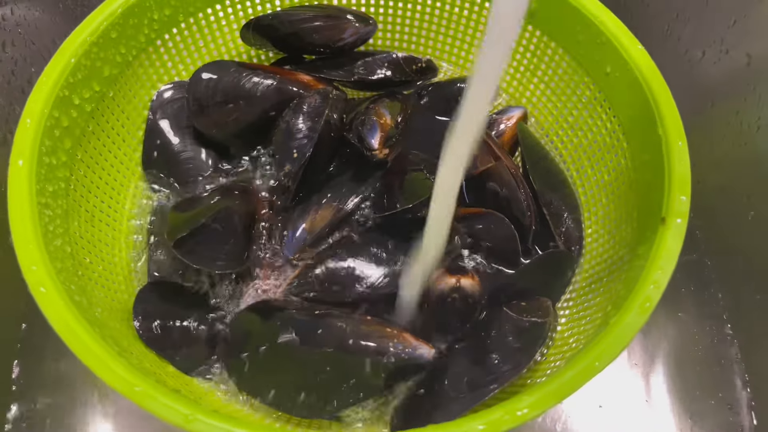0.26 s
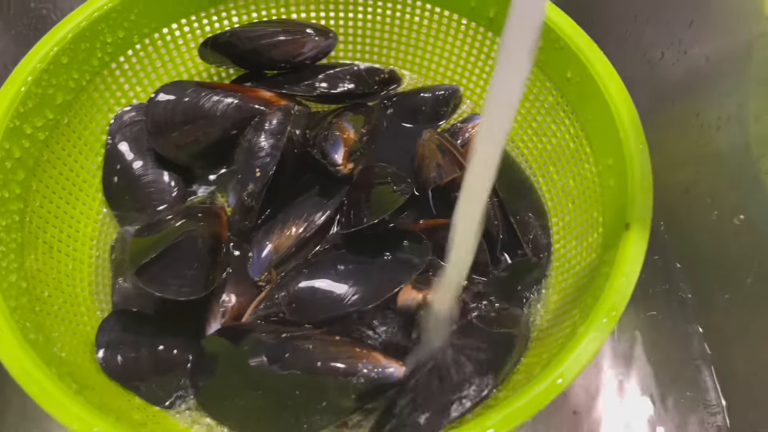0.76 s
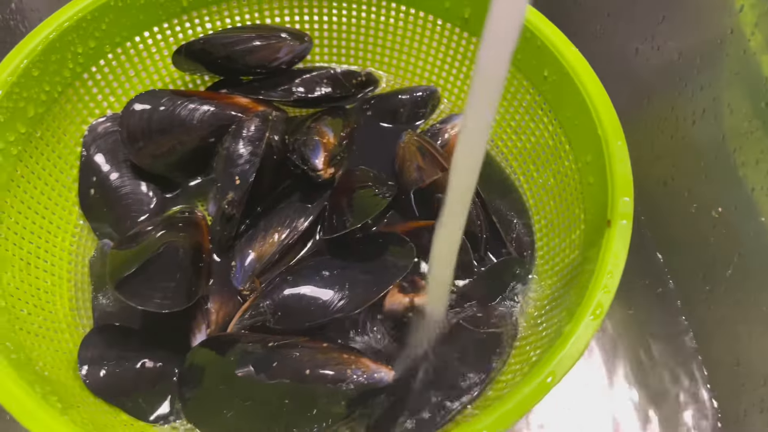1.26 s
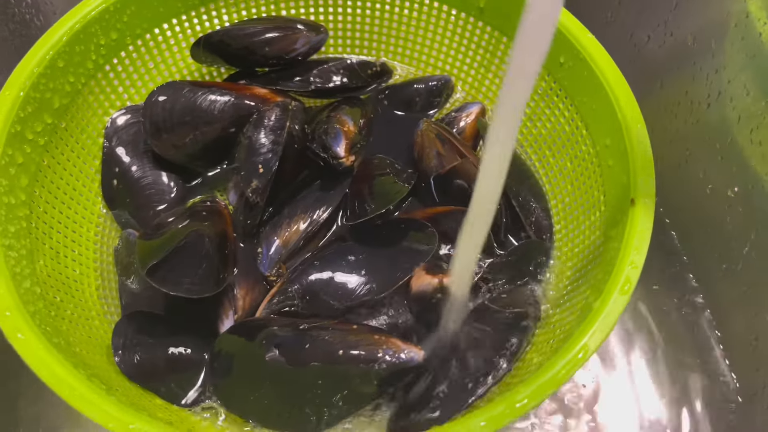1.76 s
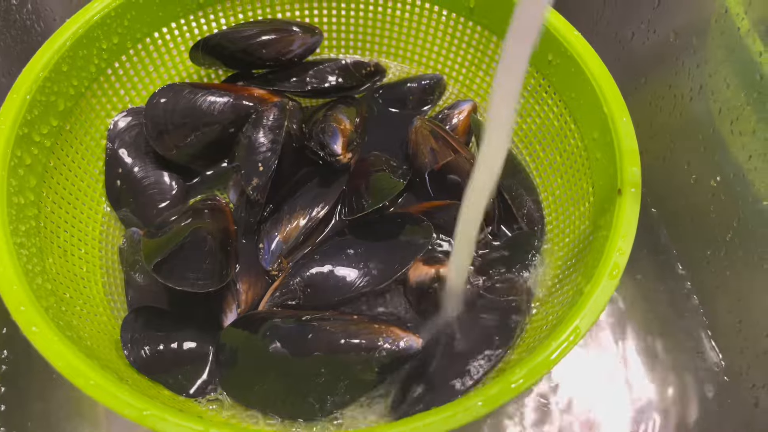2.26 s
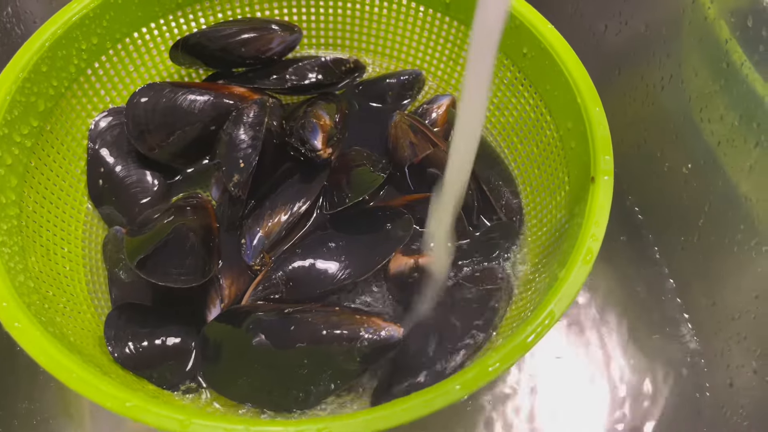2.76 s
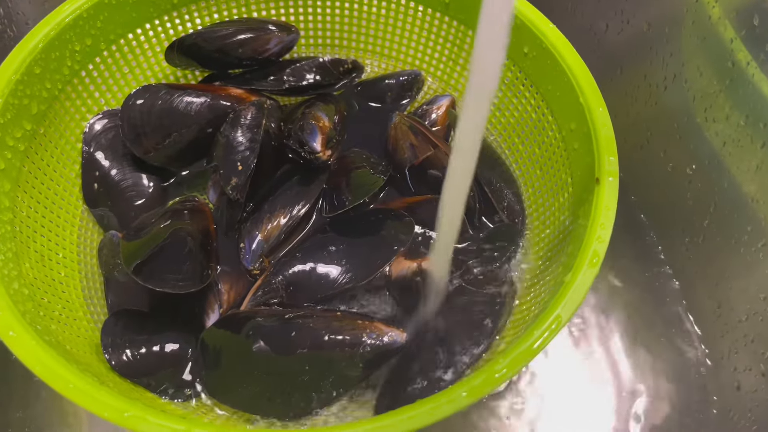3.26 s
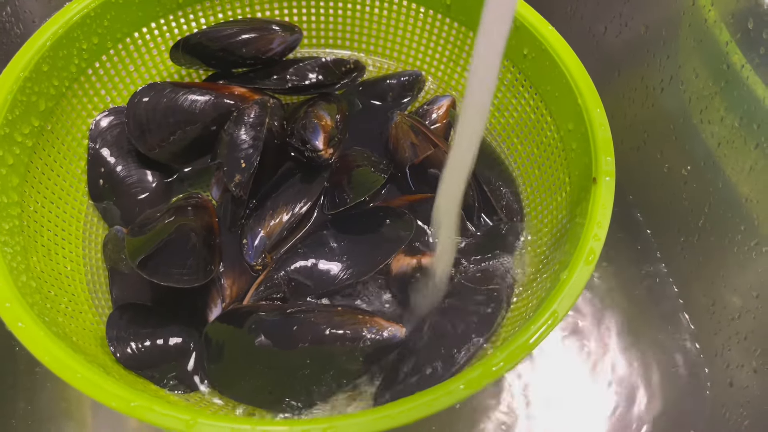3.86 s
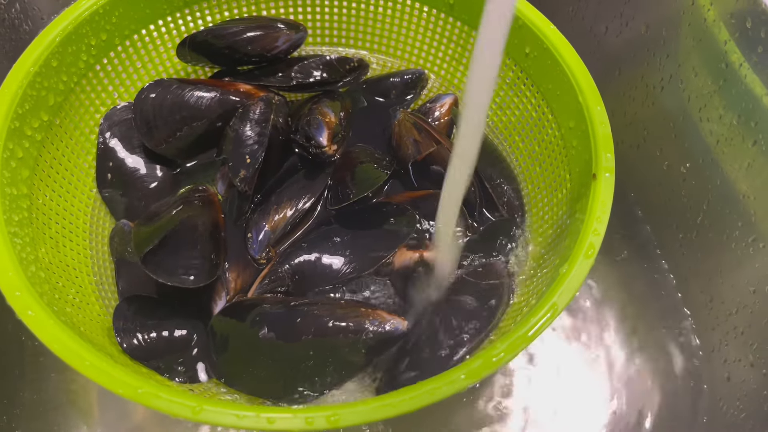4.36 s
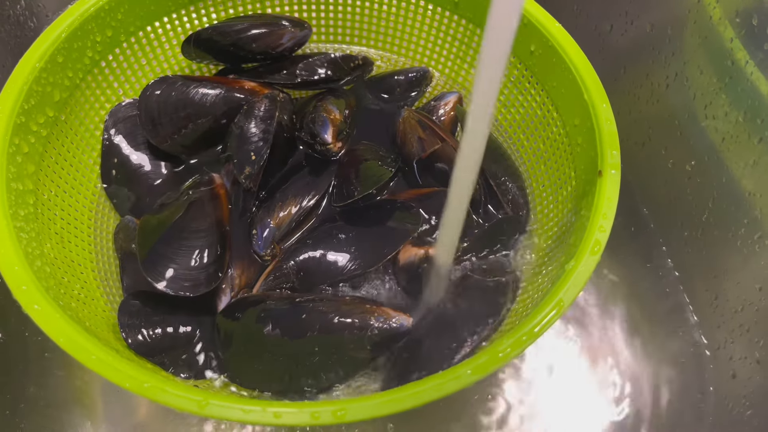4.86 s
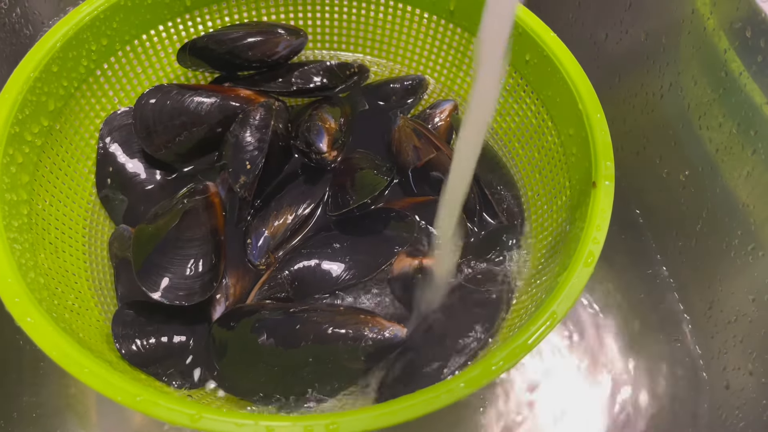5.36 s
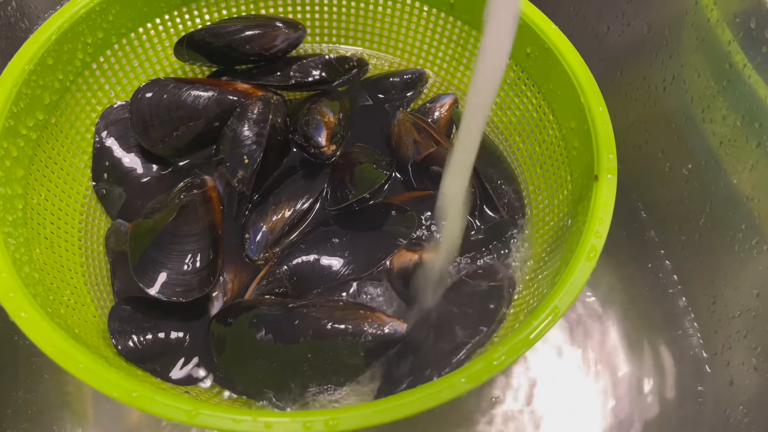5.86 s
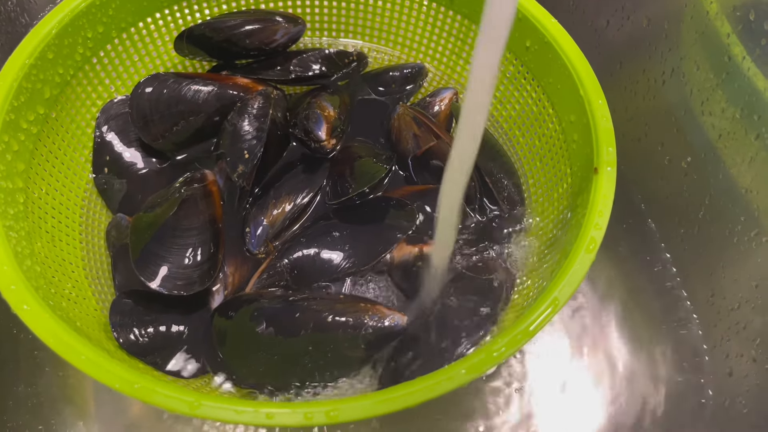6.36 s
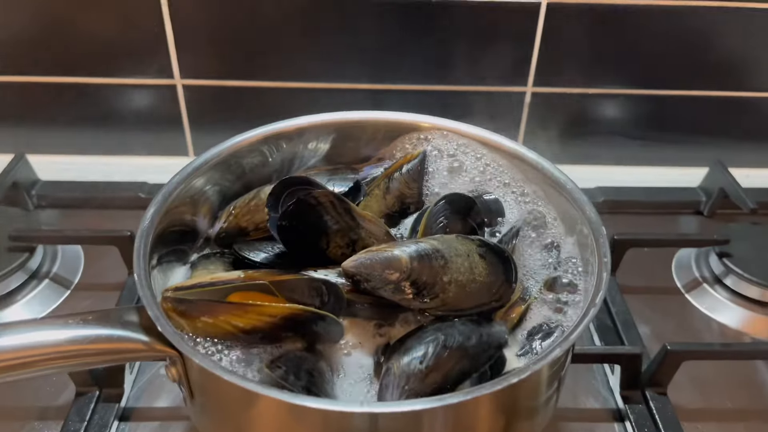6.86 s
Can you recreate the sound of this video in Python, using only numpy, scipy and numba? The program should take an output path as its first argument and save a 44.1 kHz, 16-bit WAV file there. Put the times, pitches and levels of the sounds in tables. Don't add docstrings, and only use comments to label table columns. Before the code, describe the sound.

Close, hissing tap stream gurgles among mussel shells, with colander bumps, steel basin booms and a loud late knock, before faint pot bubbling.

```python
import sys
import numpy as np
from scipy import signal
from scipy.fft import rfft, irfft
from scipy.io import wavfile
from scipy.ndimage import uniform_filter1d
from numba import njit

SR = 44100
rng = np.random.default_rng(int(sys.argv[2]) if len(sys.argv) > 2 else 0)


def attenuation_scalar(level_db):
    decades = np.asarray(level_db, float) / 20
    return 10 ** decades


def wav_out(sig):
    wavfile.write(sys.argv[1], SR, np.round(np.clip(np.atleast_2d(sig).T, -1, 1) * 32767).astype(np.int16))


N = 313545
TIME = np.arange(N) / SR
HZ = np.fft.rfftfreq(N, 1 / SR)

# (time [s], plunge [0-1], air pocket pitch [Hz])
STREAM_PLUNGE = [(0.0, 0.66, 2250), (0.07, 0.2, 2250), (0.18, .1, 1800), (0.23, 0.45, 1990),
                 (0.33, .95, 2300), (0.39, .4, 2490), (0.45, .05, 2330), (0.55, 0.7, 2350),
                 (0.68, 1.1, 2500), (0.75, 0.97, 2530), (2.6, 0.96, 2560), (3.5, 1.02, 2690),
                 (4.1, 0.93, 2710), (5.6, .9, 2550), (5.8, 0.98, 2300), (5.89, .6, 1900), (5.96, 1.1, 1720),
                 (6.05, 0.92, 2550)]
# (frequency [Hz], left level [dB per Hz], right minus left [dB], likeness [0-1])
SPRAY_COLOUR = [(40, -38, 20, 0.9), (182, -19.5, 2, 1), (445, -9.5, -1.5, 0.86), (1023, -23, -4, 0.5),
                (1360, -12.5, -4.5, 0.22), (2960, -10.5, -4.5, 0.4), (4340, -14, 1, 0),
                (5700, -9, -4, 0.12), (7230, -13, -1, 0.14), (8430, -12, -1.5, 0.5), (11030, 2.5, -55, 0.3),
                (11274, 0, -26, 0.7), (14000, -24.5, 13.5, 0.06), (14500, -28, 20, 0.66)]
# (time [s], peak [dB])
SPRAY_SPITS = [(0.001, -14.5), (0.042, -18), (0.24, -15.5), (0.3797, -21), (0.6647, -16), (1.126, -21.5),
               (2.157, -23), (2.474, -32), (2.928, -25), (3.8757, -13), (4.4947, -33.5), (4.6134, -12.5),
               (4.9277, -27), (5.0404, -21.5), (5.09, -17), (5.2863, -19), (5.4817, -26.5), (5.5495, -13),
               (5.7994, -20), (5.9448, -9), (6.198, -19.5)]
# (time [s], peak [dB], pitch [Hz], t60 [s])
SPLASH_PUFFS = [(0.1294, -28, 1880, 0.18), (0.1594, -27, 1800, 0.084), (0.189, -27, 1560, 0.08),
                (0.281, -27, 1590, 0.068), (0.2882, -25, 2200, 0.08), (0.3641, -26, 2640, 0.086),
                (0.5167, -26, 2160, 0.14), (0.6215, -23.5, 1400, 0.031), (5.945, -18, 2250, 0.065),
                (5.945, -21.5, 4300, .04), (5.947, -20, 1300, .05)]
# (frequency [Hz], width [Hz], level [dB])
SHELL_HOLLOWS = [(1920, 120, -8), (2190, 87, -6), (2752, 214, -3), (3197, 120, -8.5)]
# (time [s], peak [dB], pitch [Hz], t60 [s])
SHELL_CLICKS = [
    (0.1602, -27, 1860, 0.014),
    (0.181, -28, 1510, 0.024),
    (0.289, -22, 2220, 0.011),
    (0.517, -19, 2180, 0.011),
    (0.6264, -21, 2710, 0.0085),
    (4.4944, -46, 2730, 0.012),
    (5.946, -6, 1670, 0.01),
    (5.9462, -18, 4800, 0.006),
    (5.9528, -17, 1740, 0.012),
    (6.231, -24, 2770, 0.019),
]
# (frequency [Hz], width [Hz], level [dB])
BASIN_MODES = [(172, 14, -2.5), (226, 47, -1), (245, 20.6, -1.5), (294.6, 29, 1.5), (350, 50, -1),
               (419, 59, -13), (535, 15, -6.5), (678, 265, -9)]
# (time [s], peak [dB], ring [Hz], ring t60 [s], shake re ring [dB])
STEEL_KNOCKS = [(0.016, -27, 602, 0.12, -11), (3.027, -30.5, 271, 0.2, 2.5), (3.069, -26, 168, 0.28, -6),
                (3.919, -23.5, 174, 0.48, -7.5), (4.307, -28, 287, 0.33, -3), (4.478, -18, 226, 0.38, -4),
                (4.479, -16, 486, 0.14, -20), (4.509, -16.5, 303, 0.16, -10), (4.549, -24, 460, 0.12, -24),
                (4.558, -15, 440, 0.062, -9), (4.589, -18.5, 172, 0.25, -17),
                (4.648, -24.5, 230, 0.38, -11), (4.748, -24.5, 304, 0.26, -1.5),
                (5.047, -28.5, 290.4, 0.39, -2.5), (5.669, -19, 251.5, 0.3, 0.5),
                (5.759, -25, 222, 0.12, -13), (5.949, -9, 166, 0.24, -6.5), (6.009, -28, 183, 0.52, -15)]
# (time [s], peak [dB], ring [Hz], ring t60 [s], shake re ring [dB])
COLANDER_BUMPS = [
    (0.001, -24, 350, 0.044, 7.5),
    (0.2135, -21, 345, 0.059, 0),
    (0.620, -12.5, 365, 0.052, -2),
    (0.835, -21.5, 358, 0.086, 2),
    (1.783, -36, 396, 0.055, -12),
    (1.865, -26, 303, 0.068, -5),
]
# (frequency [Hz], lead of the right [turns])
BASIN_ECHOES = [(60, -0.094), (500, -0.082), (950, -0.35), (1900, -0.012), (2500, -0.24), (2900, -0.018),
                (3300, -1), (3600, 1), (4000, -1.3), (4400, -0.49), (5300, -0.68), (6000, -0.51),
                (8600, 0.28)]
# (time [s], peak [dB], t60 [s])
HAND_JOLTS = [
    (0.0, -51, .6),
    (0.6, -47, 0.18),
    (3.04, -29, 0.66),
    (3.98, -40, 0.57),
    (4.35, -41, .3),
    (4.54, -28.5, 0.39),
    (4.74, -45.5, 0.92),
    (5.1, -44, 0.42),
    (5.675, -28.5, 0.43),
    (5.935, -28, 0.37),
]
# (time [s], level [dB])
SIMMER_LEVEL = [
    (6.46, -60),
    (6.584, -46),
    (7.11, -49),
]
# (time [s], peak [dB], pitch [Hz], t60 [s], left minus right [dB])
POT_POPS = [(6.483, -54, 860, 0.01, -2.0), (6.503, -45, 1350, 0.012, -6), (6.587, -43, 1400, 0.012, -2.5),
            (6.617, -48, 1800, 0.012, -2.5), (6.629, -46, 1600, 0.012, -3.0),
            (6.735, -55, 1270, 0.012, 0.0), (6.757, -51, 1060, 0.012, 3), (6.775, -45, 1300, 0.012, -1.5),
            (6.786, -38.5, 1310, 0.014, -5), (6.807, -46, 1350, 0.012, -2), (6.869, -60, 1700, 0.012, -1),
            (6.909, -34.5, 1296, 0.013, -5), (7.025, -56, 1400, 0.012, -2.5), (7.064, -52, 1070, 0.012, 2)]
# (time [s], peak [dB], pitch [Hz], t60 [s])
POT_FIZZES = [(6.5869, -52, 8240, 0.02), (6.6154, -50, 8070, 0.02), (6.629, -40, 6100, 0.037),
              (6.7915, -47, 7700, 0.022), (7.0798, -43.5, 9280, 0.02), (6.6494, -53, 2400, 0.22),
              (6.6794, -53, 2380, 0.2), (6.7094, -61, 2750, 0.22)]
# (frequency [Hz], level [dB per Hz])
HUSH_COLOUR = [(24, -30), (60, -1), (105, 3.5), (180, -13), (260, -5.5), (650, -15), (1400, -9.5),
               (2600, -17.5), (3300, -28), (5000, -23), (7000, -34), (8100, -18), (9000, -29), (12000, -38)]
# (frequency [Hz], width [Hz], level [dB])
GAS_WHISTLE = [(3720, 90, 0), (5900, 400, -7)]
# (frequency [Hz], turn [turns])
PORT_SPREAD = [(8600, 0.13), (9150, .21), (9800, 0.39), (10300, 0.53), (10900, 0.68), (11500, 0.83),
               (11900, 0.93)]
# (frequency [Hz], share of mid [0-1], share of side [0-1])
EMPTY_PATCHES = [(3000, 0.046, 0), (3690, 0.13, .02), (4100, 0.019, .2), (4630, .1, 0), (5380, .16, .02),
                 (6360, 0.047, 0.31), (7310, 0.19, 0.3), (7920, 0, .12), (8490, 0.1, 0.16), (9490, 0.02, 0),
                 (9795, .8, 0), (10220, 0.96, 0), (10500, 0.0097, 0), (12400, 0.087, 0),
                 (11900, 0.073, 0.87), (13150, 0.19, 0.7), (13280, 0.8, 0.61), (13600, .93, .97),
                     (14240, .93, 0.97), (14900, .25, 0.95), (15440, .35, 0.91), (15800, 0.65, 1)]

SPRAY_DB, GLANCING_SPRAY_DB, GLANCING_GURGLE_DB = -34.5, 4, -16
WOBBLE, WOBBLE_PER_S, POCKET_DRIFT = 0.088, 14, .035
BUMP_BODY_DB, KNOCK_BODY_DB = -12.5, -33
RIGHT_LAG_S = .00048
HAND_DB, HAND_SWING_DB, JOLT_RISE_S = -61, 3, 0.024
CHANGE_S = 6.449
POT_DB = -61
TOP_HZ, TOP_LOST_S = 15800, (5.83, 6.03)
HOLES_FADE_S, HOLES_LEFT = 4.2, .3
FRAME, FRAME_START, PATCH = 1024, 471, 16


def curve(table):
    s, *columns = np.transpose(table)
    return [np.interp(TIME, s, c) for c in columns]


def over_hz(table):
    hz, *columns = np.transpose(table)
    return [np.interp(np.log(HZ + 1), np.log(hz), c) for c in columns]


def level(x, db):
    return x * attenuation_scalar(db) / np.sqrt(np.mean(x ** 2))


def resonate(x, modes):
    gain = 0
    for k, (hz, width, db) in enumerate(modes):
        gain = gain + (-1) ** k * attenuation_scalar(db) / (1 + 2j * (HZ - hz) / width)
    return irfft(rfft(x) * gain, N)


def walk(rate):
    hold = int(SR / rate)
    steps = np.repeat(rng.standard_normal(N // hold + 1), hold)
    return 0.85 * uniform_filter1d(uniform_filter1d(steps, hold), hold)[:N]


def patter(per_s, scatter_db):
    hit = rng.random((2, N)) < per_s / SR
    rarity = np.minimum(rng.exponential(size=(2, N)), 3)
    return level(hit * rng.standard_normal((2, N)) * attenuation_scalar(scatter_db * rarity), 0)


def blend(pair, likeness, in_basin=True):
    a, b = rfft(pair)
    c = np.clip(likeness, 0, 1)
    turn = np.exp(2j * np.pi * in_basin * over_hz(BASIN_ECHOES)[0])
    return np.array([a, c * a * turn + np.sqrt(1 - c ** 2) * b])


@njit
def ring(start, hz, t60, glide, left, right):
    out = np.zeros((2, N))
    for k in range(len(start)):
        length = int(t60[k] * SR)
        p = np.exp((2j * np.pi * hz[k] - np.log(1000) / t60[k]) / SR)
        q = np.exp(2j * np.pi * hz[k] * glide[k] / SR / length)
        z = 1. + 0j
        for i in range(start[k], min(start[k] + length, N)):
            out[0, i] += left[k] * z.imag
            out[1, i] += right[k] * z.imag
            z *= p
            p *= q
    return out


def rings(s, db, hz, t60, glide, pan_db):
    one = np.ones(len(s))
    start = (s * SR).astype(np.int64)
    left, right = attenuation_scalar(db + pan_db / 2) * one, attenuation_scalar(db - pan_db / 2) * one
    return ring(start, hz * one, np.maximum(t60, .002) * one, glide * one, left, right)


def burst(s, db, t60, rise):
    t = np.maximum(TIME - s, 0)
    return attenuation_scalar(db - 60 * t / t60) * (1 - np.exp(-t / rise))


def puffs(events, width):
    out = 0
    for s, db, hz, t60 in events:
        breath = level(resonate(rng.standard_normal(N), [(hz, width * hz, 0)]), -5.5)
        out = out + burst(s, db, t60, rise=0.031 * t60) * breath
    return out


def bubbles(per_s, hz, spread, cycles, scatter_db, pan_db):
    s = np.cumsum(rng.exponential(size=20000)) / per_s
    chance = rng.standard_normal((20000, 3))[s < N / SR].T
    s = s[s < N / SR]
    pitch = np.clip(np.interp(s, TIME, hz) * np.exp(spread * chance[0]), 50, SR / 3)
    return level(rings(s, scatter_db * chance[1], pitch, cycles / pitch, 0.94, pan_db + 5 * chance[2]), 0)


def from_left(pair):
    return irfft(rfft(pair) * np.exp(-2j * np.pi * HZ * np.array([[0], [RIGHT_LAG_S]])), N)


def sink():
    flow_db, gurgle_db, pocket_hz = stream()
    water = spray(flow_db, gurgle_db) + gurgle(pocket_hz) * attenuation_scalar(flow_db + gurgle_db - 0.5)
    splashes = puffs(SPLASH_PUFFS, width=0.076) * attenuation_scalar(np.array([[2.5], [-2.5]]))
    return water + splashes + drumming() * attenuation_scalar(flow_db) + knocks() + clicks() + rumble() * hand() * attenuation_scalar(3.0)


def stream():
    plunge, pocket_hz = curve(STREAM_PLUNGE)
    glance = 1 - plunge + WOBBLE * walk(WOBBLE_PER_S)
    flow_db = SPRAY_DB + GLANCING_SPRAY_DB * glance
    return flow_db, GLANCING_GURGLE_DB * glance, pocket_hz * (1 + POCKET_DRIFT * walk(6))


def spray(flow_db, gurgle_db):
    left_db, lean_db, likeness = over_hz(SPRAY_COLOUR)
    spits = np.zeros(N)
    for s, db in SPRAY_SPITS:
        spits += burst(s, db + 36, t60=.01, rise=.0004)
    hiss = rng.standard_normal((2, N)) * (1 + spits / attenuation_scalar(flow_db + 41))
    drops = hiss + attenuation_scalar(-2.0) * patter(4500., scatter_db=2.5)
    colour = blend(drops, likeness) * attenuation_scalar(left_db + np.array([0 * lean_db, lean_db]))
    shares = over_hz(np.column_stack([[400, 2000, 5500, 10500], np.eye(4)]))
    slow_dbs, quick_dbs = [3.44, 1.6, 1.2, 1.1], [0.91, 1.5, 1.9, 1.62]
    lifts = [0.47, 0.26, 0.087, 0]
    out = 0
    for share, slow_db, quick_db, lift in zip(shares, slow_dbs, quick_dbs, lifts):
        flicker_db = slow_db * walk(45) + quick_db * walk(140) + lift * gurgle_db
        out = out + irfft(colour * np.sqrt(share), N) * attenuation_scalar(flicker_db)
    return level(out, 8.01) * attenuation_scalar(flow_db)


def gurgle(centre_hz):
    settled = np.clip((TIME - .33) / .25, 0, 1)
    strikes = irfft(blend(patter(1500., scatter_db=0.5) * attenuation_scalar(2.0 * walk(25.06)), 0.14), N)
    hollows = level(resonate(strikes, SHELL_HOLLOWS) * attenuation_scalar(np.array([[3.], [-3.]])), 0)
    air = bubbles(700., centre_hz, spread=.22, cycles=28., scatter_db=2.8, pan_db=5.)
    return settled * hollows + attenuation_scalar(-0.5 - 4.5 * settled) * air


def drumming():
    return level(resonate(irfft(blend(patter(400., scatter_db=3.5), .8), N), BASIN_MODES), -20)


def knocks():
    s, db, hz, t60, shake_db = np.transpose(COLANDER_BUMPS + STEEL_KNOCKS)
    body_db = np.repeat([BUMP_BODY_DB, KNOCK_BODY_DB], [len(COLANDER_BUMPS), len(STEEL_KNOCKS)])
    s = s + 0.00305
    shake = sum(burst(a, b, 1.7 * c, rise=.006) for a, b, c in zip(s, db + shake_db - 3, t60))
    basin = level(resonate(irfft(blend(rng.standard_normal((2, N)), .8), N), BASIN_MODES), -5)
    body = rings(s + .013, db + body_db + 6, 130., .12, -.2, -1.5)
    side_db = np.where(s < 1, -7., -14.)
    blows = 0
    for ratio, more_db in [(1, -3.5), (1.2, side_db), (.68, side_db)]:
        blows = blows + rings(s, db + more_db, ratio * hz, t60, -0.055, 0.95)
    blows = rfft(blows) * (1j * HZ / (110 + 1j * HZ)) ** 2 / (1 + 1j * HZ / 900) ** 3
    body = rfft(body) * (1j * HZ / (70 + 1j * HZ)) ** 2 / (1 + 1j * HZ / 150) ** 2
    return from_left(irfft(blows + body, N)) + shake * basin


def clicks():
    s, db, hz, t60 = np.transpose(SHELL_CLICKS)
    return from_left(rings(s, db, hz, t60, 0.089, 3.0))


def rumble():
    colour_db = over_hz([(15, -34), (45, 1.0), (75, -3.5), (110, -8.5), (200, -52.5)])[0]
    deep = blend(rng.standard_normal((2, N)), 1.0) * attenuation_scalar(colour_db)
    return level(irfft(deep, N) * attenuation_scalar(2.0 * walk(14)), 0)


def hand():
    jolts = sum(burst(s, db, t60, JOLT_RISE_S) for s, db, t60 in HAND_JOLTS)
    return attenuation_scalar(HAND_DB + HAND_SWING_DB * walk(7)) + jolts


def pot():
    simmer = bubbles(240.0, np.full(N, 1350.), spread=0.29, cycles=19.0, scatter_db=-1.5, pan_db=-4.0)
    simmer = simmer * attenuation_scalar(curve(SIMMER_LEVEL)[0] - 17.5)
    fizzes = puffs(POT_FIZZES, width=0.26)
    return irfft(rfft(simmer + pops() + fizzes + burner()) * (HZ < 12200), N)


def pops():
    s, db, hz, t60, pan_db = np.transpose(POT_POPS)
    skins = 0
    for ratio, more_db in [(.87, -5), (1.05, -6), (1.26, -4), (1.48, -6)]:
        skins = skins + rings(s, db + more_db, ratio * hz, t60, .15, pan_db)
    skins = resonate(resonate(skins, [(1450, 900, 1)]), [(1450, 900, 3)])
    return skins + resonate(skins, [(1330, 50, -5), (1600, 50, -4), (1950, 60, -5)])


def burner():
    likeness = over_hz([(100, .92), (700, 0.56), (2600, 0.19)])[0]
    air = blend(rng.standard_normal((2, N)), likeness, in_basin=False)
    hush = level(irfft(air * attenuation_scalar(over_hz(HUSH_COLOUR)[0]), N), POT_DB + 1.0)
    return hush + level(resonate(rng.standard_normal((2, N)), GAS_WHISTLE), POT_DB - 14.0)


def ports(dry):
    left, right = rfft(dry)
    shared = np.clip((HZ - 8300) / 600, 0, .93)
    turned = left * np.exp(2j * np.pi * over_hz(PORT_SPREAD)[0])
    right = shared * turned + np.sqrt(1 - shared ** 2) * right
    return irfft(np.array([left, right]), N)


def scene():
    after = np.clip((TIME - CHANGE_S) / 0.001, 0, 1)
    fade_up = np.clip(0.6 + (TIME - CHANGE_S) / 0.15, 0, 1)
    return ports(sink()) * (1 - after) + ports(pot()) * after * fade_up


def kept_patches(cells, s, hz):
    chance = rng.standard_normal((2, len(s), len(hz)))
    chance = (chance + .7 * np.roll(chance, 1, axis=1) + .4 * np.roll(chance, 1, axis=2)) / 1.28
    at, *shares = np.transpose(EMPTY_PATCHES)
    share = np.array([np.interp(hz, at, c) for c in shares])[:, None]
    boom = uniform_filter1d(np.abs(cells[0, :, :28]).mean(axis=1), size=8)[:, None]
    lost = np.clip(.15 * (boom / np.median(boom) - 1.3), 0, .4)
    lost = lost + (s > TOP_LOST_S[0]) * (s < TOP_LOST_S[1])
    share = (share + (hz > 13300) * lost) * np.where((hz < 6500) & (s > HOLES_FADE_S), HOLES_LEFT, 1)
    share = share * (hz > 3100) * ((hz > 9000) | (s < CHANGE_S))
    return (.5 + .5 * np.tanh(.85 * chance) > share) * (hz < TOP_HZ)


def top_cut(x):
    return signal.sosfilt(signal.butter(12, 17080, fs=SR, output="sos"), x)


def record(dry):
    sound = irfft(rfft(dry) * (1j * HZ / (45 + 1j * HZ)) ** 3, N)
    pair = np.array([sound[0] + sound[1], sound[0] - sound[1]]) / 2
    pair = np.pad(pair, ((0, 0), (2 * FRAME - FRAME_START, 2 * FRAME)))
    at_sample = np.arange(pair.shape[1] // FRAME - 1)[:, None] * FRAME + np.arange(2 * FRAME)
    phase = np.outer(np.arange(2 * FRAME) + (FRAME + 1) / 2, np.arange(FRAME) + .5)
    window = signal.windows.kaiser_bessel_derived(2 * FRAME, 4 * np.pi)[:, None]
    basis = np.cos(np.pi / FRAME * phase) * window * np.sqrt(2 / FRAME)
    cells = pair[:, at_sample] @ basis
    s = (at_sample[:, FRAME, None] - 2 * FRAME + FRAME_START) / SR
    hz = (np.arange(FRAME // PATCH) + .5) * PATCH * SR / 2 / FRAME
    frames = cells * np.repeat(kept_patches(cells, s, hz), PATCH, axis=2) @ basis.T
    lapped = (frames[:, 1:, :FRAME] + frames[:, :-1, FRAME:]).reshape(2, -1)
    mid, side = lapped[:, FRAME - FRAME_START:][:, :N]
    return top_cut(np.array([mid + side, mid - side]))


dry = scene()
out = record(dry)
wav_out(out)
```